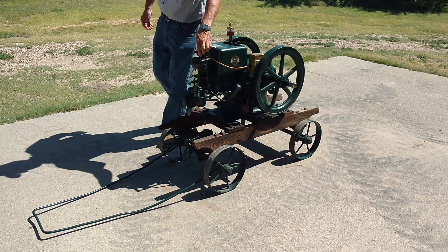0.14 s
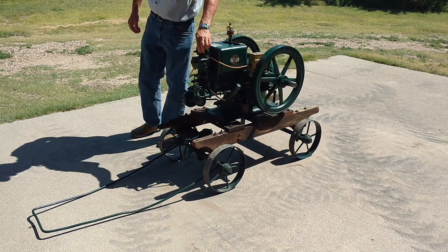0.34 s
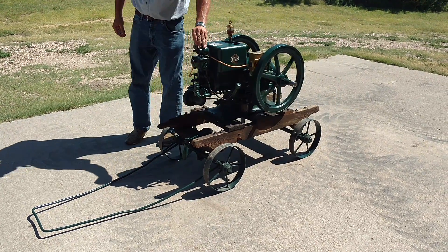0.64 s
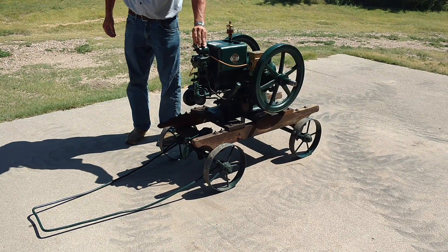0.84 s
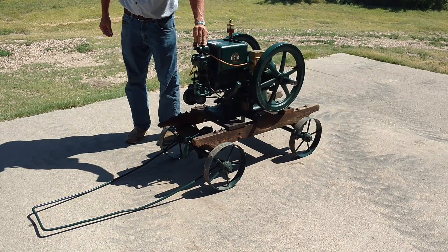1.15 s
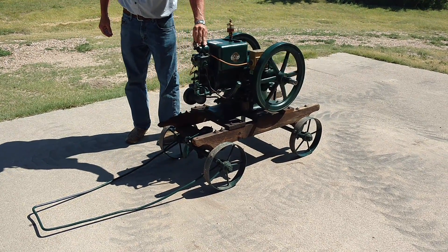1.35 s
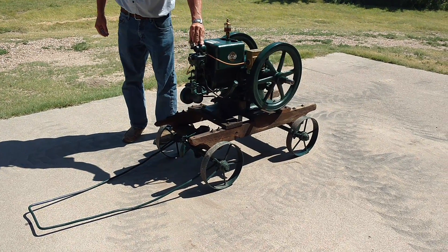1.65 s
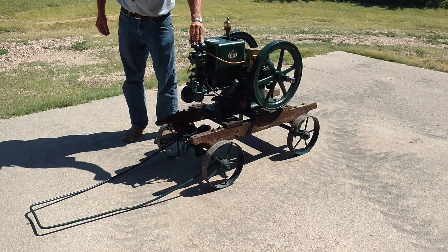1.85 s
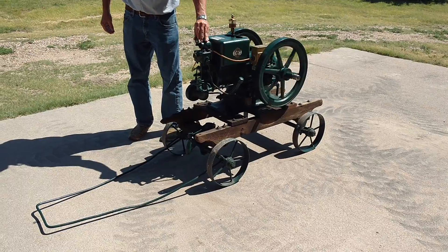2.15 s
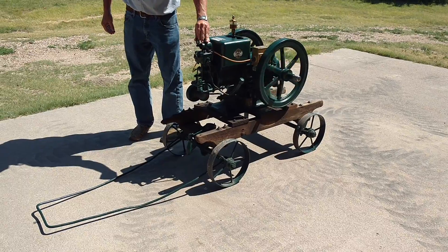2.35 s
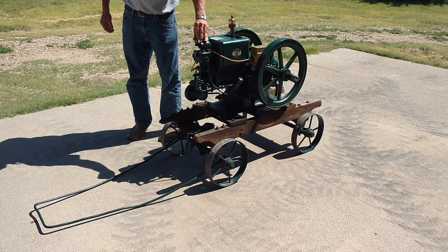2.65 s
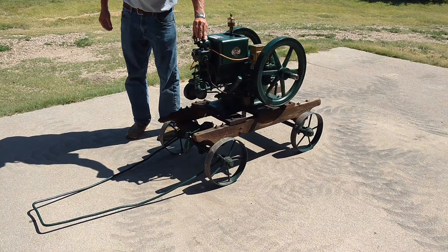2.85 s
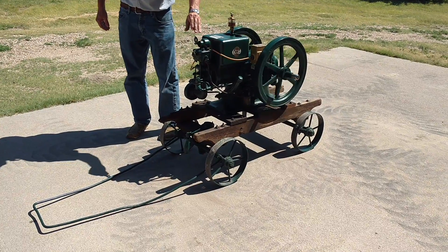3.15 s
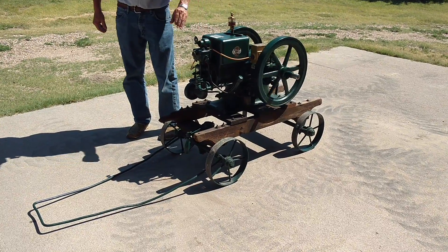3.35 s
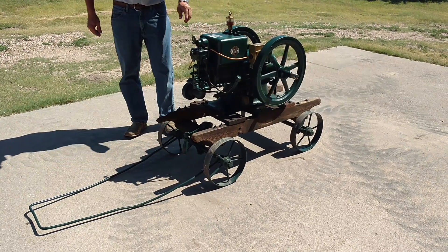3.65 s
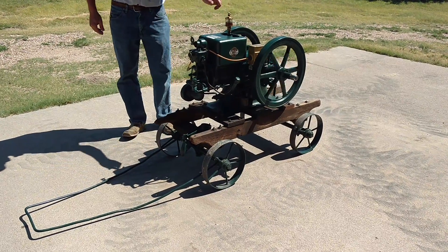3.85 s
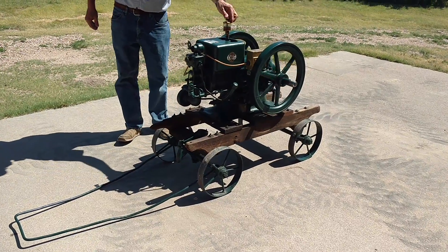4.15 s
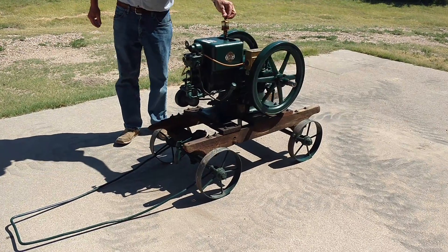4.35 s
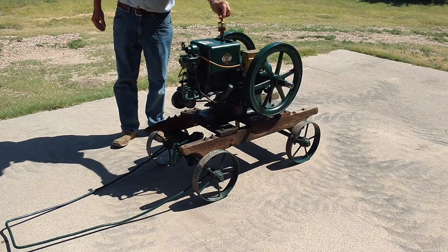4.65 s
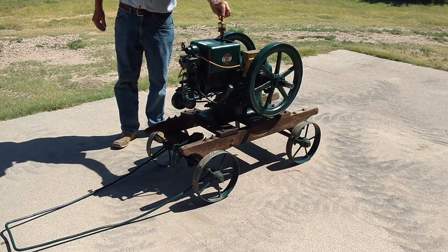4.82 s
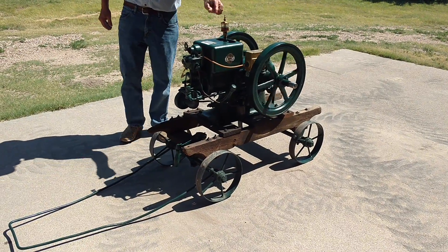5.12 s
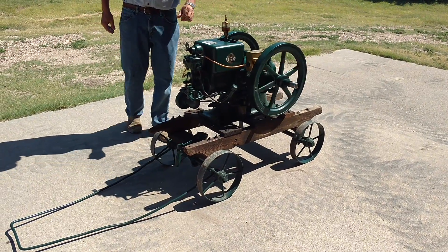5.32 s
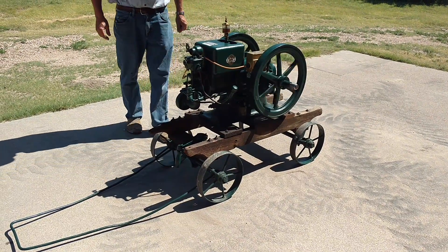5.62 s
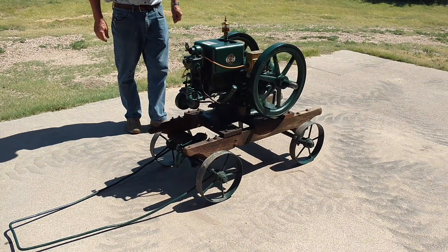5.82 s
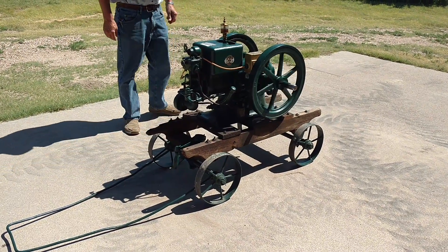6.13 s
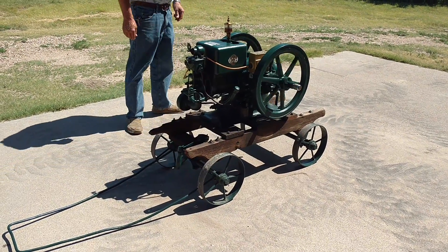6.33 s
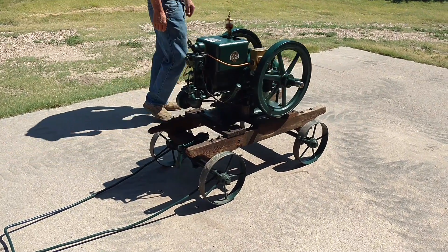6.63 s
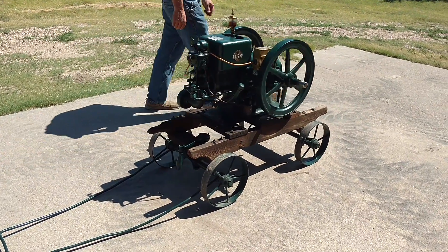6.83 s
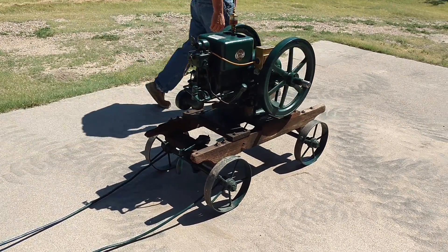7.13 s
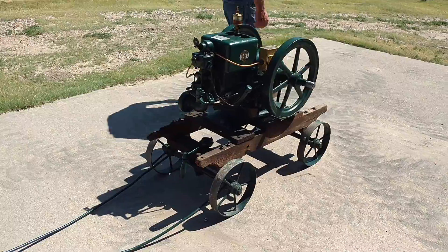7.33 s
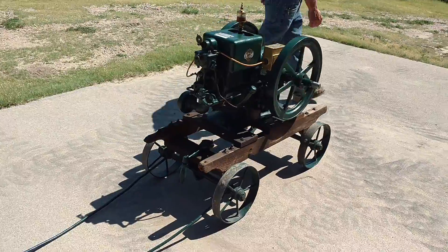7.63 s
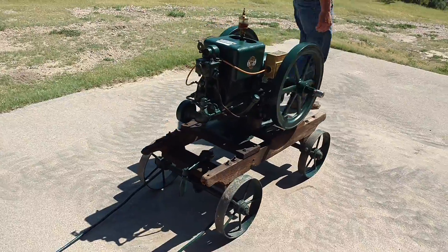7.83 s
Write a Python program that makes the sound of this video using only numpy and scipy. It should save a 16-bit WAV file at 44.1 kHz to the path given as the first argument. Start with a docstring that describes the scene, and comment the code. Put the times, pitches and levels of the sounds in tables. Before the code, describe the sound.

Vintage hit-and-miss engine running outdoors, heard fairly close and dry. Each turn brings a whistle or squeak of the inlet valve, gear knocks on cast iron and light latch ticks. Abrupt hollow exhaust puffs with soft thumps occur on some turns, others coast with clatter alone. Under it lie faint gear rub, cart rumble and quiet open air. The clatter begins light, becomes busy and bright mid-way, and keeps going to the end.

```python
"""Open concrete, with a hit-and-miss engine turning on a wooden cart a few metres away.
Cam, latch and rocker clatter: noise bursts ring the resonances of iron and small steel parts.
The exhaust chuffs as shaped noise, pipe and beams thump as short swings, the inlet valve chirps and
whistles as gliding tones; gear rub, rumble, a hum and open air lie beneath.
Two microphone ports comb the mid and side signals."""
import sys
import numpy as np
from scipy import signal
from scipy.fft import rfft, irfft, next_fast_len
from scipy.io import wavfile
from scipy.ndimage import uniform_filter1d

SR = 44100
rng = np.random.default_rng(int(sys.argv[2]) if len(sys.argv) > 2 else 0)


def generate_wav(sig):
    """Save sig (samples, or channels by samples) to the path in sys.argv[1] as 16-bit PCM at SR."""
    pcm = np.round(np.clip(np.atleast_2d(sig).T, -1, 1) * 32767).astype(np.int16)
    wavfile.write(sys.argv[1], SR, pcm)


N = 351918

# Levels and lengths in the tables are relative settings: each source trims them further.
# cam turns, each opened by the inlet whistle:
# (start_s, gear_out_db, gear_back_db, early_rattle_db, ticks_out_db, whistle_db)
TURNS = [(0.0052, -36, -50, -56, -43.5, -42.5), (0.33, -27, -35.5, -37.5, -39, -42),
         (0.6313, -38, -32.5, -57, -47.5, -47), (0.9176, -34.5, -44, -40, -42, -43),
         (1.1916, -35, -38.5, -51, -41.5, -47), (1.455, -35.5, -39.5, -49, -41, -42),
         (1.7114, -38.5, -35.5, -51, -37.5, -50), (1.95, -36, -37.5, -44, -41, -44),
         (2.1837, -35.5, -32.5, -57, -44.5, -40), (2.4207, -35, -30.5, -47, -36.5, -38),
         (2.663, -31, -31, -43, -34.5, -44), (2.9098, -31.5, -31, -47, -32.5, -33),
         (3.159, -34, -22.5, -39.5, -36, -32), (3.413, -28, -34, -31, -31, -31.5),
         (3.673, -22, -24.5, -36, -34, -30), (3.9372, -21.5, -40, -36, -30, -25.5),
         (4.2085, -28.5, -27, -43, -36, -38), (4.4871, -25, -40, -39, -34, -38),
         (4.7707, -35, -33, -49, -46, -44), (5.068, -35.5, -33, -45.5, -39, -49),
         (5.372, -31, -47, -44, -38, -62), (5.679, -31, -31, -44.5, -37.5, -45),
         (5.989, -27.5, -37, -43, -37, -47), (6.307, -28.5, -30, -41.5, -33.5, -38),
         (6.6317, -25.5, -49, -39, -31.5, -55), (6.9616, -30.5, -31.5, -42, -34, -48),
         (7.2928, -38, -25.5, -36, -32, -32), (7.623, -33, -35.5, -56, -36, -48),
         (7.9517, -29, -29, -38, -34, -51)]
# clearest strikes of the valve gear:
# (start_s, iron_db, steel_db, top_db, iron_t60_s, iron_tilt_db_per_octave)
GEAR_STRIKES = [(0.262, -24.5, -29.5, -34, 0.071, 3), (0.287, -25.5, -36, -50, 0.071, 1.5),
                (0.445, -24.5, -37, -49, 0.21, -4), (0.498, -35, -36, -34, 0.07, 0),
                (0.577, -29, -37, -41, 0.065, 0.5), (0.884, -23.5, -36, -42, 0.054, 2),
                (0.935, -29, -33.5, -45, 0.16, 8), (1.029, -27, -40, -46, 0.062, -5.5),
                (1.164, -27.5, -34.5, -36.5, 0.059, -1), (1.339, -28.5, -44, -38, 0.076, 8),
                (1.534, -34, -36, -38, 0.13, 0), (1.558, -22.5, -41, -34, 0.091, -5),
                (1.607, -27, -41, -40, 0.08, 4), (1.853, -25.5, -39, -38, 0.087, 4.5),
                (2.034, -29.5, -27, -34, 0.34, 3), (2.09, -36, -38, -38, 0.061, 5),
                (2.377, -29, -33.5, -34, 0.091, -8.5), (2.399, -31, -32, -49, 0.061, 5),
                (2.516, -25.5, -35, -31.5, 0.22, -5), (2.638, -24, -31, -34, 0.066, 2),
                (2.759, -24.5, -32, -29.5, 0.12, -2), (2.862, -25, -26.5, -26, 0.058, 7),
                (2.884, -21.5, -25, -40, 0.061, 3), (2.936, -24, -39, -56, 0.096, 11),
                (3.008, -20.5, -34, -35, 0.15, -1), (3.056, -20.5, -33, -29, 0.22, -7),
                (3.111, -25, -25.5, -26, 0.095, -9), (3.132, -20.5, -23.5, -33, 0.064, 4.5),
                (3.223, -22, -40, -37, 0.11, 1), (3.26, -22.5, -25, -31, 0.21, 5),
                (3.307, -22, -30.5, -25.5, 0.27, 0), (3.365, -20.5, -23.5, -23, 0.083, 5),
                (3.386, -15, -21, -25, 0.059, -0.5), (3.442, -20, -28.5, -56, 0.044, 16),
                (3.478, -20, -42, -34, 0.054, 10), (3.516, -16.5, -33, -31, 0.18, 2),
                (3.561, -16.5, -25, -27, 0.098, 4), (3.623, -20, -25, -29, 0.088, 5),
                (3.644, -21.5, -31, -37, 0.055, -7), (3.7, -20.5, -35.5, -59, 0.082, 8),
                (3.734, -25, -33.5, -32, 0.068, 11), (3.775, -20, -31, -23, 0.24, -5),
                (3.824, -17.5, -26, -27, 0.062, 0), (3.887, -20, -23, -27, 0.1, 5),
                (3.908, -26, -28.5, -46, 0.12, -4), (3.964, -20.5, -34.5, -55, 0.11, 5),
                (4.042, -20, -31, -29, 0.49, -1), (4.092, -18, -26, -28, 0.11, -2),
                (4.157, -41, -30.5, -29, 0.066, 3), (4.179, -20.5, -29, -51, 0.053, 0.0),
                (4.315, -21, -29.5, -37, 0.14, 1), (4.364, -26, -32, -32, 0.11, 2),
                (4.433, -23, -32, -26, 0.1, 5), (4.455, -20, -27.5, -45, 0.11, 3),
                (4.514, -22.5, -34, -45, 0.17, 7), (4.596, -16.5, -28, -29.5, 0.13, 1),
                (4.646, -18.5, -30, -26.5, 0.078, -1), (4.678, -18, -38, -39, 0.04, -19),
                (4.686, -30, -20, -21, 0.03, -1), (4.884, -26.5, -33, -40, 0.2, -4),
                (5.009, -28, -33.5, -33, 0.095, 6), (5.032, -26, -35, -54, 0.058, 1),
                (5.183, -19, -35, -37, 0.11, -2), (5.232, -26, -34, -34, 0.15, 4),
                (5.311, -25, -29.5, -35, 0.12, 7), (5.335, -28.5, -33, -50, 0.083, 0),
                (5.402, -25, -35, -46, 0.2, 6), (5.49, -20.5, -35.5, -38, 0.14, 2),
                (5.54, -26, -32, -31, 0.13, 5), (5.621, -22.5, -33, -33, 0.056, 10),
                (5.645, -24, -32.5, -49, 0.058, 5), (5.795, -22.5, -35, -35, 0.21, -0.5),
                (5.847, -29, -32.5, -36, 0.067, -1), (5.928, -23, -28, -28, 0.059, 11),
                (5.953, -18, -33, -40, 0.053, -2), (6.019, -22.5, -32, -47, 0.16, 5),
                (6.109, -18.5, -31.5, -33, 0.14, -6), (6.164, -20, -35, -32, 0.091, -3),
                (6.245, -23.5, -30, -27, 0.06, 11), (6.269, -21.5, -28, -46, 0.063, -4),
                (6.335, -25.5, -41, -56, 0.18, 5.5), (6.428, -20.5, -31, -33, 0.21, 1),
                (6.481, -30, -30, -32, 0.14, -1.5), (6.566, -21.5, -26, -30.5, 0.15, 1),
                (6.591, -24.5, -30, -51, 0.081, -2), (6.661, -20.5, -37, -53, 0.18, 3),
                (6.757, -17.5, -31, -31, 0.14, 0), (6.81, -15.5, -27.5, -28, 0.064, 0),
                (6.898, -19, -27.5, -33, 0.056, 2), (6.923, -22.5, -35, -53, 0.051, -3),
                (6.992, -23.5, -40, -60, 0.095, 4), (7.048, -46, -35.5, -32, 0.064, 2),
                (7.082, -19, -31, -31, 0.12, -2), (7.135, -23, -29.5, -35, 0.077, 1.5),
                (7.224, -20, -27.5, -30, 0.1, 5), (7.247, -25, -26, -51, 0.15, 0),
                (7.319, -19.5, -33.5, -49, 0.2, 2), (7.377, -32, -35, -31, 0.29, 2),
                (7.417, -21, -31, -30, 0.28, -2.5), (7.473, -17, -28, -32, 0.12, 0.0),
                (7.56, -27, -35, -33, 0.04, 4), (7.585, -17, -36, -47, 0.037, -2),
                (7.744, -20, -32.5, -30, 0.14, -1), (7.797, -19, -32, -31.5, 0.054, -1),
                (7.887, -23.5, -32, -32, 0.13, 13), (7.912, -24, -36, -45, 0.059, -4)]
# gear blows on the frame in every turn: (stroke, share_of_turn, lag_s, level_db, ring_t60_s)
GEAR_BLOWS = [("out", 0.022, 0.021, 0., 0.067), ("out", 0.072, 0.0447, -4.5, 0.16),
              ("out", 0.301, 0.0224, 9.4, 0.078), ("out", 0.35, 0.0443, 1, 0.15),
              ("out", 0.493, 0.0296, -0.3, 0.24), ("back", 0.96, 0.025, 0.22, 0.096),
              ("back", 0.67, 0.0144, -0.57, 0.13)]
# light ticks of latch, spring and pushrod in every turn:
# (stroke, share_of_turn, lag_s, level_db, top_db, half_length_s)
LATCH_TICKS = [("early", 0.056, 0.007, 0.4, -37, 0.00058), ("early", 0.1, 0.0027, -0.3, -18, 0.0055),
               ("early", 0.257, 0.00091, 0, -0.64, 0.0051), ("early", 0.22, 0.033, -1.4, -1.8, 0.0081),
               ("out", 0.344, 0.011, .5, 0, 0.0052), ("out", 0.406, 0.018, -0.6, -2.5, 0.0061),
               ("out", .4, 0.0387, 1, -0.57, 0.0035), ("back", 0.598, 0.027, -9.5, -3.5, 0.012),
               ("back", .727, 0.0217, -0.5, -4, 0.0031), ("back", .86, 0.011, 0.54, -7, 0.0049),
               ("back", 0.71, 0.021, -10, 1, 0.0073)]
# loudest strikes of a small hard pin: (start_s, level_db)
PIN_STRIKES = [(2.968, -49), (3.995, -43), (4.269, -44), (6.414, -48), (6.685, -40), (6.714, -40),
               (6.735, -40), (7.169, -45), (7.372, -38), (7.396, -39.5), (7.711, -38), (7.733, -45)]
# resonances of the cast iron frame: (pitch_hz, width_hz, level_db)
IRON_MODES = [(614, 34, 6), (543, 77, -5), (706.5, 38, 12.5), (759, 15, 8), (881.5, 50, 6.5),
              (946.5, 48, 11), (1056, 78, 2), (1184, 55, 3), (1298, 110, 4.5), (1498, 120, 1.5),
              (1564, 114, 5.5), (1707, 110, -10), (1810, 59, 1), (1370, 16800, -0.5)]
# resonances of the small steel parts: (pitch_hz, width_hz, level_db)
STEEL_MODES = [(3110, 220, 18), (3550, 103, 16), (3606, 270, 8.5), (3745, 127, 12), (4055, 130, 13),
               (4140, 86, 7), (4530, 390, 13.5), (5600, 67, 19), (5800, 150, 11.5), (6700, 67, -2.5),
               (7370, 190, 4.5), (3300, 560, 15), (4920, 4600, 10)]
# brightest metal resonances: (pitch_hz, width_hz, level_db)
BRIGHT_MODES = [(8560, 290, 20), (8970, 610, 13.5), (10250, 3500, 18.3), (10710, 530, 13.6),
                (11710, 690, 12), (13000, 350, 10.6), (16300, 1200, 10)]
# firings: (start_s, chuff_db, body_db, top_db, length_s, frame_blow_db, opening_thump_db,
# closing_thump_db, beam_knock_db)
EXHAUST_FIRINGS = [(0.525, -6, -6.5, -2.5, 0.024, -28, -43, -49.5, -34),
                   (0.809, -7.5, -7, -12.5, 0.022, -29, -51, -57, -53),
                   (1.095, -3, -6, -8, 0.02, -22, -43, -48.5, -37),
                   (1.621, -1.5, -10, -10, 0.02, -8, -44, -47, -37),
                   (1.8655, -4.5, -4.5, -5, 0.021, -35, -42.5, -46.5, -29),
                   (2.0995, -3, -9.5, -2, 0.019, -38, -42, -48, -31),
                   (2.587, -9, -19, -16, 0.016, -6, -41, -45, -57),
                   (3.065, 0.5, -15, -11, 0.017, -11, -37.5, -41.5, -41),
                   (3.577, -4, -9, -10, 0.018, -33, -41.5, -45, -43),
                   (4.105, -5.5, -17, -4.5, 0.019, -42, -42, -43.5, -46),
                   (4.6777, 2, -4, -8.5, 0.012, -7.5, -35.5, -44.5, -21.5),
                   (5.563, -5, -15, -5, 0.018, -27, -40, -49, -28),
                   (6.1843, -8.5, -14, -4.5, 0.021, -7, -38, -49, -36),
                   (6.835, -8.5, -15, -2, 0.02, -6.5, -36, -49, -21),
                   (7.496, -14, -2, 1.5, 0.022, -3.5, -40.5, -49, -22.5)]
# long hisses of air through the open valve in the first turns:
# (start_s, level_db, body_db, top_db, length_s)
VALVE_HISSES = [(0.01, -29, -10, -6.5, 0.096), (0.328, -29.5, -3, -5, 0.078),
                (0.631, -32.5, -20, -8, 0.082), (0.922, -29.5, -20, -10, 0.054)]
# resonances of the exhaust pipe: (pitch_hz, width_hz, level_db)
PIPE_MODES = [(643, 310, -2.5), (880, 300, 1), (1322, 102, 8.5), (1720, 114, 5.5), (1450, 6500, -21)]
# pipe thumps in turns that do not fire: (middle_s, level_db, pitch_hz)
UNFIRED_THUMPS = [(2.368, -56, 96), (2.855, -53, 93), (3.357, -48, 91), (3.878, -48, 88), (4.424, -51, 88),
                  (4.998, -58, 91), (5.296, -57, 86), (5.914, -54, 88), (6.551, -51.5, 90),
                  (7.147, -47, 119), (7.212, -52, 88), (7.872, -58, 87)]
# jolts on the cart's beams while the engine gathers speed: (middle_s, level_db)
CART_JOLTS = [(0.393, -30), (0.671, -37), (0.7, -35), (0.959, -29.5), (0.985, -32), (1.261, -33.5),
              (1.52, -35), (1.779, -31.5), (2.03, -36)]
# squeaks of the valve: (middle_s, level_db, pitch_hz, length_s)
VALVE_SQUEAKS = [(0.847, -46, 5730, 0.011), (1.391, -39, 5900.0, 0.0095), (1.395, -45, 7300.0, 0.009),
                 (1.896, -43, 5870.0, 0.011), (1.902, -44, 7300, 0.015), (2.136, -45, 5850, 0.019),
                 (2.138, -45.0, 7220.0, 0.016), (2.368, -38, 5860, 0.02), (2.373, -42, 7200, 0.017),
                 (2.605, -40, 5950, 0.015), (2.614, -45.0, 7260, 0.02), (2.853, -35, 7200, 0.009),
                 (2.854, -35, 5880, 0.017), (3.104, -34, 5900, 0.013), (3.351, -34, 5860, 0.01),
                 (3.357, -33, 7200, 0.012), (3.614, -39, 7190.0, 0.0098), (3.875, -35, 6040.0, 0.018),
                 (4.146, -36, 6150, 0.015), (4.157, -37, 7400, 0.01), (4.419, -33.5, 5870, 0.014),
                 (4.422, -36, 7140.0, 0.009), (4.993, -41, 5930, 0.015), (5.298, -37, 5920, 0.018),
                 (5.299, -44, 7200, 0.008), (5.608, -40, 7130, 0.013), (5.608, -47, 5950, 0.011),
                 (5.911, -34, 5920, 0.014), (5.916, -51, 7160, 0.011), (6.23, -33, 5900, 0.011),
                 (6.232, -41, 7030.0, 0.011), (6.546, -35.5, 5870, 0.021), (6.883, -37, 5980, 0.012),
                 (7.208, -32, 5940, 0.02), (7.546, -33, 5800, 0.013), (7.872, -41, 7400, 0.015),
                 (7.874, -34, 5970, 0.024)]
# breathy chirps of the valve: (middle_s, level_db, pitch_hz, length_s)
VALVE_CHIRPS = [(0.304, -39, 6320, 0.015), (0.903, -43.5, 6500, 0.017), (1.437, -44, 6200, 0.012),
                (1.697, -47, 6150, 0.017), (1.939, -46.5, 6000, 0.022), (2.172, -41.5, 5970, 0.014),
                (2.407, -39.5, 6020, 0.014), (2.656, -41, 6540, 0.014), (2.901, -34.5, 6330, 0.0093),
                (3.151, -38, 6360, 0.014), (3.406, -34.5, 6400, 0.014), (3.657, -32.5, 6000, 0.0092),
                (3.922, -28, 6060, 0.011), (4.194, -34, 6120.0, 0.011), (4.467, -32, 5960, 0.012),
                (4.751, -38, 5970, 0.0075), (5.046, -36.5, 6000, 0.012), (5.35, -34.5, 5960, 0.012),
                (5.659, -34, 5970, 0.0099), (5.968, -33, 6100, 0.012), (6.285, -29, 6150, 0.0089),
                (6.608, -29.7, 6030, 0.012), (6.936, -32, 5940, 0.012), (7.265, -31, 5940, 0.011),
                (7.599, -34, 6070, 0.012), (7.93, -32, 6140, 0.016)]
# running noise of gears and bearings: (time_s, rumble_db, hiss_rel_db, cart_rumble_rel_db)
GEAR_RUB = [(0.0, -40.5, -11, -17), (0.3, -43.5, -7, -24), (1.42, -43, -5, -14), (2.3, -40, -9, -18),
            (3.51, -33.5, -9, -15), (4.25, -38.5, -11, -16.5), (5.02, -46.5, 0, -16),
            (5.18, -42, -7, -18.5), (6.0, -41.5, -6, -14), (6.75, -36.5, -9, -21.5),
            (7.98, -39.5, -10.5, -16.5)]
# level of the cart's hum: (time_s, level_db)
CART_HUM = [(0.0, -72), (0.33, -64.5), (0.82, -72.5), (1.82, -63.5), (2.13, -65), (3.07, -51.5),
            (3.51, -57), (4.67, -67.5), (4.78, -73), (5.18, -64), (5.55, -72), (6.0, -63.5), (6.49, -66),
            (6.69, -61), (7.13, -61.5), (7.4, -58), (7.64, -66), (7.98, -61)]
# gain of the open air's noise: (pitch_hz, level_db)
OPEN_AIR = [(30, -45), (70, -34), (130, -32), (300, -39.5), (1000, -66), (4000, -82), (15000, -91)]
# what the side takes from the mid: (pitch_hz, level_db)
SIDE_FROM_MID = [(40, -20), (100, -18.5), (250, -19.5), (700, -20), (2000, -62), (4000, -12.5), (8000, -21),
                 (13500, -13), (16000, -27)]
# what the side hears of its own: (pitch_hz, level_db)
SIDE_OWN = [(40, -2), (200, -29), (700, -16.5), (2000, -9), (4000, -7.5), (8000, -0.5), (13500, 0.5),
            (15200, -4), (16000, -8)]
# the rear port against the front one: (pitch_hz, level_db)
REAR_PORT = [(300, 0.63), (2800, -2.63), (5000, -7), (10000, -13.5), (13000, -6)]

SCATTER_DB, SCATTER_S = -2.4, 0.0015  # no two blows land alike
COVER_S = 0.011  # a clear strike hides pattern blows this close
STRIKE_TRIM_DB = (-2.5, 4.5, 6)  # iron, steel, top
STEEL_T60_S, TOP_T60_S = 0.042, 0.022
BLOW_LAG_S, BLOW_T60_S = 0.0064, 0.021  # a firing's blow on the frame
OPEN_LAG_S, OPEN_HZ = 0.00448, 170
CLOSE_LAG_S, CLOSE_HZ = 0.0111, 120
JOLT_THUMP_DB, JOLT_THUMP_HZ = -26, 115
KNOCK_LAG_S = 0.00594
# (share of turn, lag in s); the knock's level is set against the outgoing gear blows
WHISTLE_AT, BEAM_AT, BEAM_DB = (0.00068, -0.001), (0.43, 0.034), -8.5
LEAK_HZ, LEAK_DB = 5970, -11
HUM_HZ = 222
PORT_LAG_S, TOP_HZ = 0.000379, 15500


def metal(force, grain_db=2.0):
    """Three envelopes of impact noise drive iron, steel and bright modes, whose balance wanders."""
    # contact is a hail of tiny impacts, a few much harder than the rest
    hardness = np.repeat(rng.exponential(size=(3, N // 8 + 1)), 8, axis=1)[:, :N]
    hail = undb(grain_db * hardness)
    hail /= np.sqrt(np.mean(hail ** 2))
    # the iron keeps the tilt of the latest strike
    s, *_, tilt_db = np.transpose(GEAR_STRIKES)
    latest = np.searchsorted(s - .002, np.arange(N) / SR) - 1
    tilt_db = tilt_db[np.maximum(latest, 0)]
    iron = ring(force[0] * hail[0] * noise(), IRON_MODES, patchy_db=3.5, tilt_db=tilt_db)
    steel = ring(force[1] * hail[1] * noise(), STEEL_MODES, patchy_db=5.5)
    bright = ring(force[2] * hail[2] * noise(), BRIGHT_MODES, patchy_db=3.0)
    return bands(iron, steel, bright)


def strikes(rise_s=0.0013):
    """A sharp blow shakes iron and steel at once, each with its own decay; the top fades fastest."""
    force, t = np.zeros((3, N)), np.arange(SR // 8) / SR
    for s, *db, t60, _ in GEAR_STRIKES:
        t60s = np.array([[max(t60, .01)], [STEEL_T60_S], [TOP_T60_S]])
        shape = (1 - np.exp(-t / rise_s)) * decay(t, t60s)
        add(force, s - rise_s, undb(np.add(db, STRIKE_TRIM_DB))[:, None] * shape)
    for s, db in PIN_STRIKES:  # the pin rattles its neighbours
        add(force[1:], s, undb([[db + 8.5], [db + 4.0]]) * decay(t, 0.025))
    return force


def clatter(rise_s=0.0058, iron_db=2.5, steel_db=-14.0):
    """Each gear or firing blow builds quickly and dies; the steel parts shake along a little."""
    force, t = np.zeros((3, N)), np.arange(SR // 8) / SR
    _, out_db, back_db, *_ = np.transpose(TURNS)
    blows = unstruck(every_turn(GEAR_BLOWS, out=out_db, back=back_db))
    kicks = [(row[0] + BLOW_LAG_S, row[5], BLOW_T60_S) for row in EXHAUST_FIRINGS]
    for s, db, t60 in blows + kicks:
        shape = (1 - np.exp(-t / rise_s)) * decay(t, max(t60, .01))
        add(force[:2], s, undb([[db + iron_db], [db + steel_db]]) * shape)
    return force


def ticks(steel_db=2.0, bright_db=2.0, stretch=0.8):
    """A short rattle of small parts swells to its peak and fades more slowly."""
    force, t = np.zeros((3, N)), np.arange(-SR // 30, SR // 30) / SR
    slope = np.where(t < 0, .6, 1.3)
    _, _, back_db, early_db, out_db, _ = np.transpose(TURNS)
    rows = every_turn(LATCH_TICKS, early=early_db, out=out_db, back=back_db)
    for s, db, top_db, length in unstruck(rows):
        shape = np.exp(-(t / (stretch * max(length, .001) * slope)) ** 2)
        add(force[1:], s + t[0], undb([[db + steel_db], [db + top_db + bright_db]]) * shape)
    return force


def pings(t60=0.06, mode_hz=10270, tick_hz=10250.0, tick_t60=0.01, tick_db=-4.0, gain_db=8.5):
    """A hard pin rings in one clear high mode, with a briefer tick at its onset."""
    out, t = np.zeros(N), np.arange(SR // 8) / SR
    mode = np.sin(2 * np.pi * mode_hz * t) * decay(t, t60)
    tick = np.sin(2 * np.pi * tick_hz * t) * decay(t, tick_t60)
    shape = (mode + undb(tick_db) * tick) * (1 - np.exp(-t / 0.00042))
    for s, db in PIN_STRIKES:
        add(out, s, undb(db + gain_db) * shape)
    return out


def chuffs(rise_s=0.013, fall_s=0.0019, gain_db=-10.5, body_lag_s=0.0018):
    """Gas bursts through the opening valve and is cut off; the pipe's body sounds a little later."""
    force, t = np.zeros((3, N)), np.arange(SR // 8) / SR
    bursts = [row[:5] for row in EXHAUST_FIRINGS] + VALVE_HISSES
    for s, db, body_db, top_db, length in bursts:
        shape = (1 - np.exp(-t / rise_s)) / (1 + np.exp((t - length) / fall_s))
        add(force[0], s + body_lag_s, undb(db + body_db + gain_db) * shape)
        add(force[1:], s, undb([[db + gain_db], [db + top_db + gain_db]]) * shape)
    force *= wander(3, 2.63, 0.00097)  # turbulent flutter
    middle_modes = STEEL_MODES[-2:] + STEEL_MODES[7:8]
    layers = zip(force, (PIPE_MODES, middle_modes, BRIGHT_MODES))
    return bands(*(ring(e * noise(), modes, patchy_db=4.5) for e, modes in layers))


def thumps():
    """The pipe thumps as a chuff opens and closes, in some unfired turns, and weakly at jolts."""
    s, _, _, _, length, _, open_db, close_db, _ = np.transpose(EXHAUST_FIRINGS)
    rows = [(a + OPEN_LAG_S, db, OPEN_HZ) for a, db in zip(s, open_db)]
    rows += [(a + CLOSE_LAG_S, db, CLOSE_HZ) for a, db in zip(s + length, close_db)]
    rows += UNFIRED_THUMPS
    rows += [(a, db + JOLT_THUMP_DB, JOLT_THUMP_HZ) for a, db in CART_JOLTS]
    return pulses(rows, 0.36, 26.4, tail=0.94, sag_hz=4.0)


def afterswing(lag_s=0.0199, gain_db=14.5, start_hz=127.0):
    """After a chuff is cut off the pipe swings on weakly, rising in pitch."""
    rows = [(row[0] + row[4] + lag_s, row[7], start_hz) for row in EXHAUST_FIRINGS]
    return pulses(rows, 0.63, gain_db, tail=3.9, sag_hz=-7.5)


def beams(beam_hz=475.0):
    """The cart's beams knock at jolts, at firings and softly in every turn, as short swings."""
    rows = CART_JOLTS + [(row[0] + KNOCK_LAG_S, row[8]) for row in EXHAUST_FIRINGS]
    rows += every_turn([("out", *BEAM_AT, BEAM_DB)], out=np.array(TURNS)[:, 1])
    return pulses([(s, db, beam_hz) for s, db in rows], 0.44, 19.0, tail=1.0, sag_hz=25.2)


def valve():
    """The inlet valve whistles as a turn opens; squeaks and breathy rising chirps are air tones too."""
    openings = zip(cam(*WHISTLE_AT), TURNS)
    whistles = [(s + 0.007, row[5], 8336., .014) for s, row in openings]
    whistle = squeals(whistles, 0.0015, 0.081, 5.7, 1.02)
    chirp = squeals(VALVE_CHIRPS, 0.085, 1.49, 5.2, 1.59, octave_db=-10.5)
    squeak = squeals(VALVE_SQUEAKS, 0.016, 0.55, 7.8, 1.08, octave_db=-16.0)
    return whistle + chirp + squeak


def running(top_db=-9.0):
    """Gear teeth and bearings rub on; the wooden cart rumbles and air leaks thinly past the valve."""
    s, *columns = np.transpose(GEAR_RUB)
    db, hiss_db, rumble_db = (np.interp(np.arange(N) / SR, s, c) for c in columns)
    cart = ring(noise(), [(159, 85, 1), (231, 50, 0.34), (271, 24, -1.1)], patchy_db=2.0)
    rumble = undb(db + rumble_db + 8.0) * wander(1, 4.7, 0.043) * cart
    leak = undb(db + hiss_db + LEAK_DB) * ring(noise(), [(LEAK_HZ, 160, 0)], patchy_db=3.)
    rub = undb(np.array([db, db + hiss_db, db + hiss_db + top_db]) - 3.0)
    rub = rub * wander(2, 4.2, 0.0088)[[0, 1, 1]]  # steel and top waver together
    return rub, rumble + leak


def hum(gain_db=15.0, swell_db=4.5):
    """A beam of the cart hums on one nearly steady note."""
    hz = HUM_HZ * wander(1, .05, .05)[0]
    level = undb(np.interp(np.arange(N) / SR, *np.transpose(CART_HUM)) + gain_db)
    return level * wander(1, swell_db, 0.035)[0] * np.sin(2 * np.pi * np.cumsum(hz) / SR)


def pulses(table, turns, gain_db, tail=1.3, sag_hz=0.):
    """Brief dips of pressure, a swing or so long, that slide in pitch and trail off."""
    out, t = np.zeros(N), np.arange(-SR // 30, SR // 15) / SR
    for s, db, hz in table:
        # the ports pass a low note weakly, so it starts the louder
        size = undb(db + gain_db) * 100 / hz
        swing = np.cos(2 * np.pi * t * (hz - sag_hz * t * hz))
        shape = np.exp(-.5 * (t * hz / (turns * np.where(t < 0, 1, tail))) ** 2)
        add(out, s + t[0], -size * swing * shape)
    return out


def squeals(table, glide, rough, gain_db, stretch, octave_db=-40.):
    """Short air tones in a narrow gap, gliding up and roughened by noise."""
    out = np.zeros((2, N))
    for s, db, hz, length in table:
        span = stretch * length
        t = np.arange(int(span * SR)) / SR - span / 2
        turn = 2 * np.pi * hz * (t + glide * t ** 2 / (2 * span))
        # sine in the mid, cosine in the side
        tone = np.array([f(turn) + undb(octave_db) * f(2 * turn) for f in (np.sin, np.cos)])
        add(out, s - span / 2, undb(db + gain_db) * np.cos(np.pi * t / span) * tone)
    return out * (1 + rough * uniform_filter1d(noise(), 30) * np.sqrt(30))


def cam(share, lag_s):
    """The time of one place in every cam turn."""
    start = np.array(TURNS)[:, 0]
    length = np.diff(start)
    return start + share * np.append(length, length[-1]) + lag_s


def every_turn(pattern, **stroke_db):
    """Rows (start_s, level_db, rest of the pattern row) played once a turn, a little uneven."""
    rows = []
    for stroke, share, lag_s, db, *rest in pattern:
        chance = rng.standard_normal((2, len(TURNS)))
        times = cam(share, lag_s) + SCATTER_S * chance[0]
        levels = stroke_db[stroke] + db + SCATTER_DB * chance[1]
        rows += [(s, level, *rest) for s, level in zip(times, levels) if s < N / SR]
    return rows


def unstruck(rows):
    """The turn's pattern gives way where a clear strike lands."""
    s = np.array(GEAR_STRIKES)[:, 0]
    return [row for row in rows if np.min(np.abs(row[0] - s)) > COVER_S]


def ring(x, modes, patchy_db=0., tilt_db=0.):
    """Sound through a set of resonances, each driven unevenly; the bank is scaled to unit noise gain."""
    bank = [(signal.iirpeak(min(hz, .45 * SR), hz / width, SR), undb(db)) for hz, width, db in modes]
    click = signal.unit_impulse(SR // 10)
    norm = np.linalg.norm(sum(g * signal.lfilter(*ba, click) for ba, g in bank))
    drive = wander(len(modes), patchy_db, 0.021)
    octaves = np.log2(np.array(modes)[:, :1] / 1100)
    drive = drive * undb(tilt_db * octaves)
    return sum(g * signal.lfilter(*ba, x * d) for (ba, g), d in zip(bank, drive)) / norm


def cut(x, order, hz, kind):
    """Butterworth filter."""
    return signal.sosfilt(signal.butter(order, hz, kind, fs=SR, output="sos"), x)


def bands(low, middle, top, low_hz=460.0, split_hz=2540.0):
    """Keep body, middle and top each in its own range."""
    low = cut(cut(low, 4, low_hz, "high"), 2, split_hz, "low")
    return low + cut(middle, 2, [split_hz, 9000], "band") + cut(top, 2, 7000, "high")


def colour(x, points):
    """Shape a spectrum by (pitch_hz, level_db) points."""
    size = next_fast_len(N)
    hz, db = np.transpose(points)
    f = np.arange(size // 2 + 1) * SR / size + 1
    gain = undb(np.interp(np.log(f), np.log(hz), db))
    return irfft(rfft(x, size) * gain, size)[..., :N]


def wander(count, spread_db, hold_s):
    """Smoothed random gains."""
    k = int(hold_s * SR)
    smooth = uniform_filter1d(uniform_filter1d(rng.standard_normal((count, N)), k), k)
    return undb(spread_db * np.sqrt(1.41 * k) * smooth)


def decay(t, t60):
    """Exponential fade of 60 dB in t60 seconds."""
    return np.exp(-np.log(1000) * t / t60)


def noise():
    """Unrelated noise for mid and side."""
    return rng.standard_normal((2, N))


def add(track, s, sound):
    """Mix a short sound in at a time."""
    i = max(int(s * SR), 0)
    n = min(sound.shape[-1], N - i)
    track[..., i:i + n] += sound[..., :n]


def undb(db):
    """Decibels to gain."""
    return 10 ** (np.asarray(db) / 20)


def scene():
    """All sources as mid and side rows, turned to left and right."""
    rub, drone = running()
    force = np.sqrt(clatter() ** 2 + strikes() ** 2 + ticks() ** 2 + rub ** 2)
    engine = metal(force) + chuffs() + drone
    engine[0] += thumps() + afterswing() + beams() + hum()  # mid only
    engine += valve() + pings()
    # the concrete and far trees send back a weak short tail
    t = np.arange(SR // 5) / SR
    tail = undb(-37.0) * rng.standard_normal((2, len(t))) * decay(t, 0.088)
    echo = signal.oaconvolve(engine, tail, axes=1)[:, :N]
    mid, apart = engine + echo + colour(noise(), OPEN_AIR)
    side = colour(mid, SIDE_FROM_MID) + colour(apart, SIDE_OWN)
    return np.array([mid + side, mid - side])


def record(dry, side_depth=0.99, leak=0.00084, gain_db=-6.5):
    """The late, duller rear port is taken from the mid and added to the side: interleaved combs."""
    mid, side = (dry[0] + dry[1]) / 2, (dry[0] - dry[1]) / 2
    # windowed sinc for a delay of a fraction of a sample
    offset = np.arange(64) - 16 - PORT_LAG_S * SR
    late = np.sinc(offset) * np.exp(-(offset / 9) ** 2)
    rear = colour(signal.oaconvolve([mid, side], late[None])[:, 16:N + 16], REAR_PORT)
    mid, side = mid - rear[0], side + side_depth * rear[1]
    side = side + leak * mid
    # cut both ends of the spectrum
    rumble_cut = signal.butter(2, 62, "high", fs=SR, output="sos")
    top_cut = signal.ellip(9, .2, 80, TOP_HZ, fs=SR, output="sos")
    stereo = undb(gain_db) * np.array([mid + side, mid - side])
    return signal.sosfilt(np.vstack([rumble_cut, top_cut]), stereo)


dry = scene()
out = record(dry)
generate_wav(out)
```